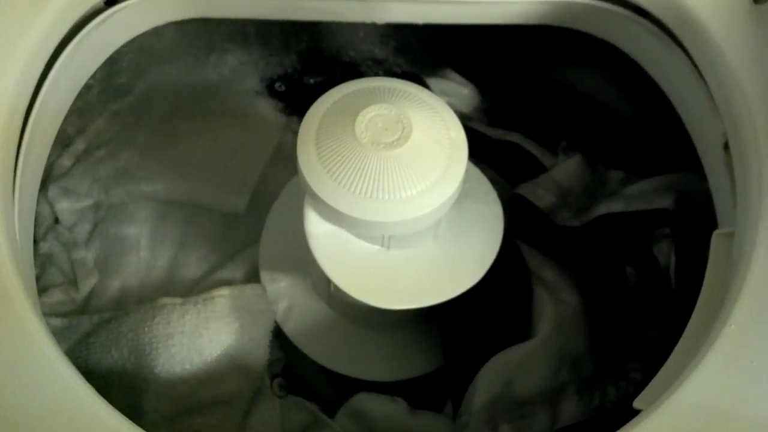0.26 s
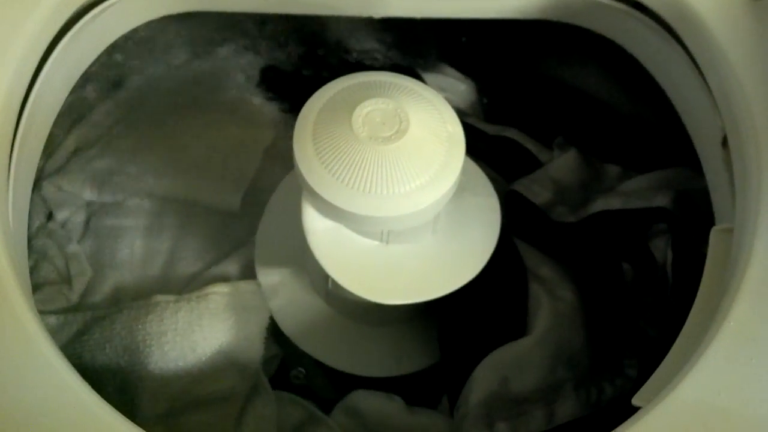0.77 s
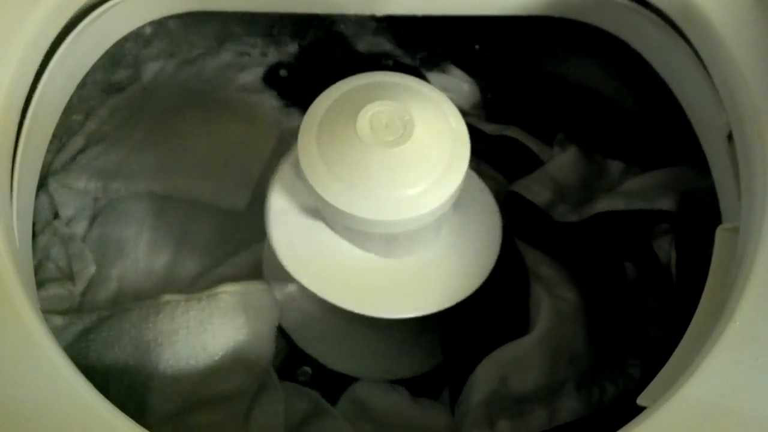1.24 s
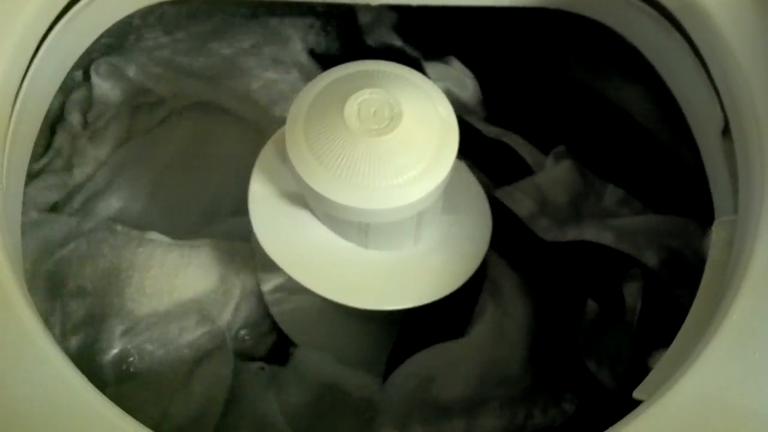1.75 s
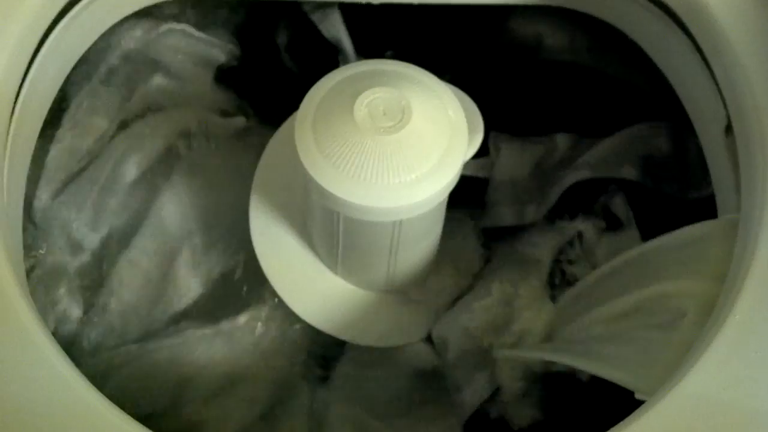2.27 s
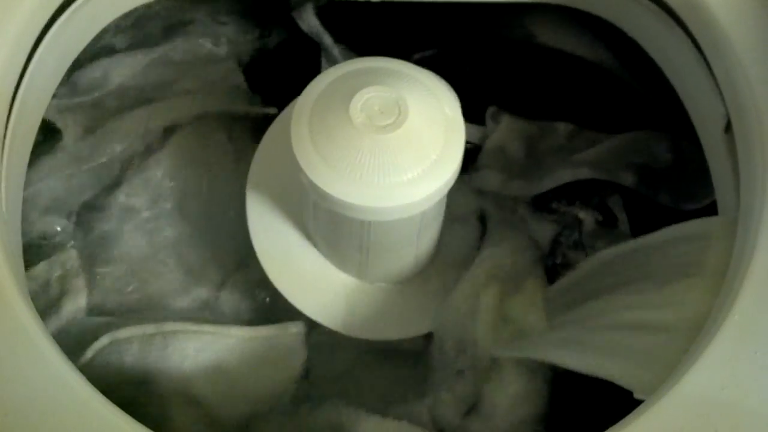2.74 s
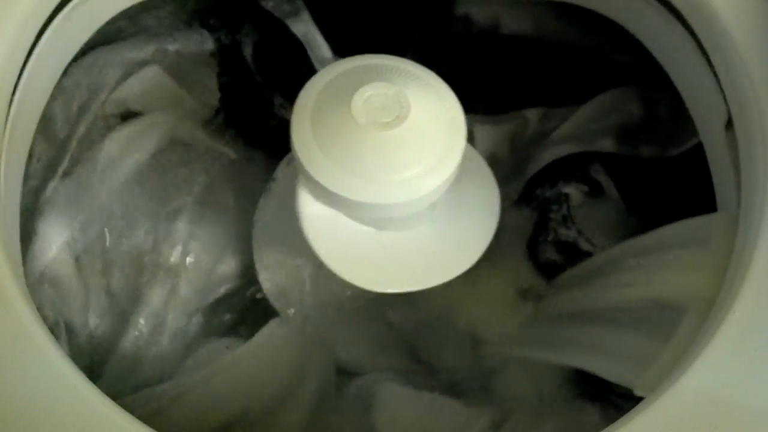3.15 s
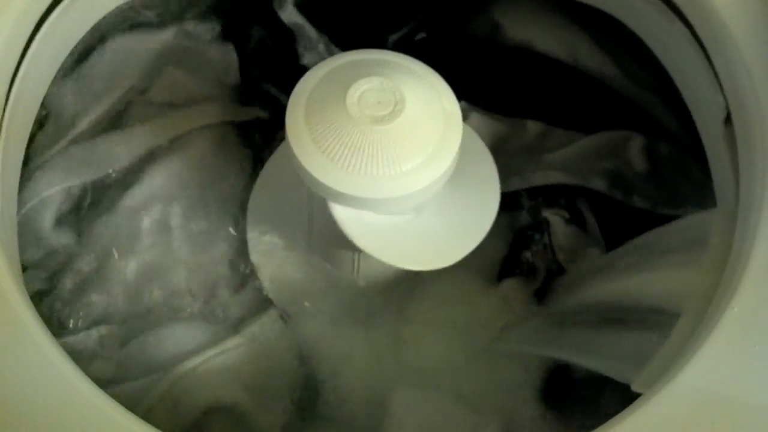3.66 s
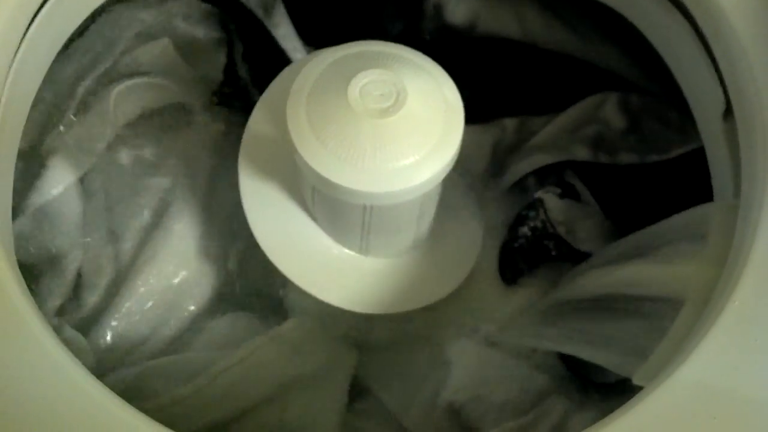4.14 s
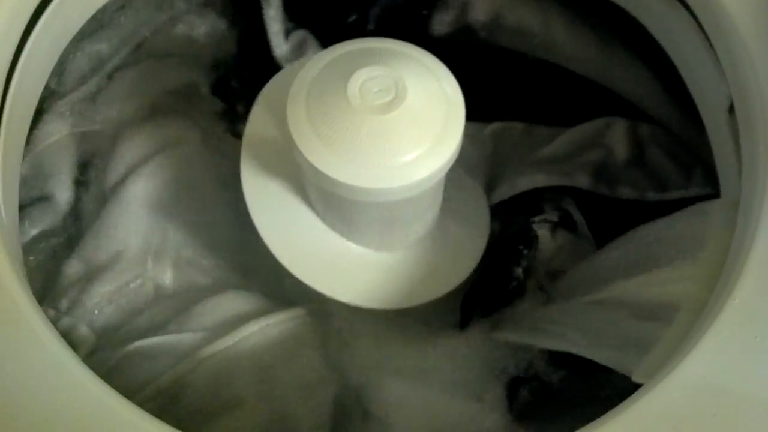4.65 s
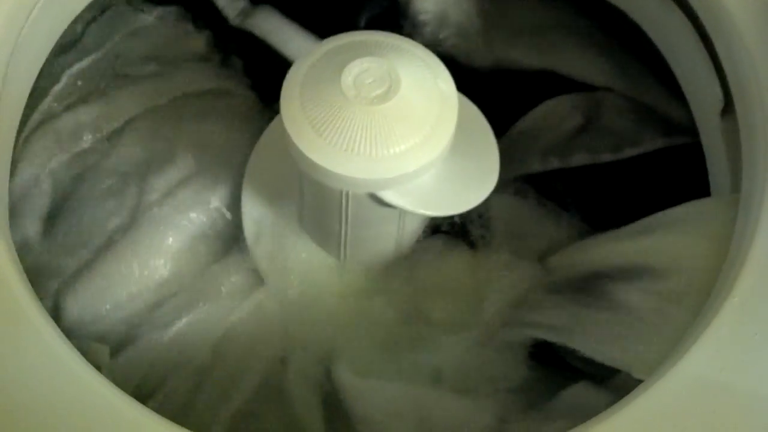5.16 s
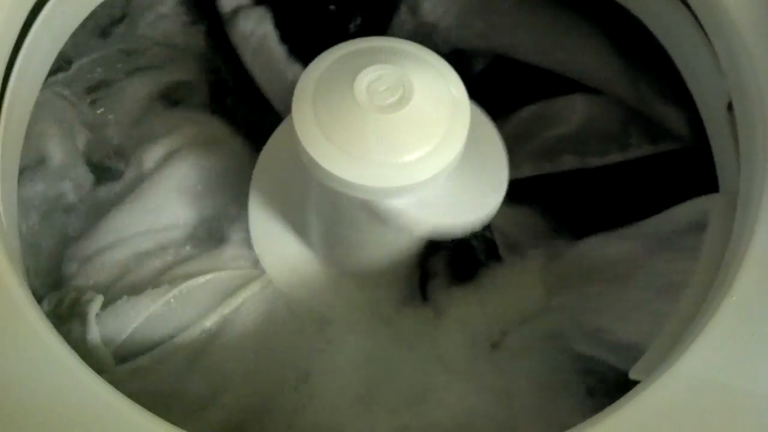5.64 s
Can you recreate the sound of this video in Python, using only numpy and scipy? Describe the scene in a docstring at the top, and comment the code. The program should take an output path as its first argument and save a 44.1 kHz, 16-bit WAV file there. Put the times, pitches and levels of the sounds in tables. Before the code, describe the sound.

A washer's filling hiss thins after a sharp clack, a motor hums, knocks engage the drive, and laundry sloshes rhythmically with one tick per stroke.

```python
"""Water hisses into an open top-loading washing machine, over a washing sound and the buzz of the valve coil.
A valve clacks, the jet thins and stops, and the motor idles; then the drive engages with more knocks.
The agitator swings the laundry to and fro: water noise, humming, gurgles, splashes and about one tick a stroke.
Water is shaped noise and short bubbles, the motor is sine waves, and knocks are bursts ringing a steel cabinet.
The recorder widens its stereo by flipping and delaying the right side."""
import sys
import numpy as np
from scipy import signal
from scipy.fft import rfft, irfft
from scipy.io import wavfile
from scipy.ndimage import uniform_filter1d

SR = 44100
rng = np.random.default_rng(int(sys.argv[2]) if len(sys.argv) > 2 else 0)


def dump(signal):
    """Clip the signal to [-1, 1] and save it as 16-bit WAV at the path in sys.argv[1]."""
    limited = np.clip(np.atleast_2d(signal).T, -1, 1)
    pcm = np.round(limited * 32767).astype(np.int16)
    wavfile.write(sys.argv[1], SR, pcm)


N = 260190  # length of the scene in samples
FRAME, HOP = 1024, 256  # short-time spectra of the water noise, in samples

# fill jet, relative colour: (frequency [Hz], level per Hz [dB])
JET_COLOUR = [(150, -36), (300, -7.5), (500, -7.5), (1000, -12.5), (1600, -16), (2600, -17), (4000, -18.5),
              (5000, -14.5), (6500, -12.5), (9000, -16), (12000, -19), (15800, -22)]
# resonances of the inlet pipe: (frequency [Hz], width [Hz], boost [dB])
PIPE_RESONANCES = [(335, 72, 9.5), (740, 36, 16.5), (1090, 78, 9)]
# churning water: (time [s], level [dB], brightness [dB per octave above the pivot])
CHURN = [(0.0, -27.5, -8), (0.08, -36, 1.5), (0.26, -33.5, 1), (0.76, -35, 1.5), (1.46, -30, -1),
         (1.84, -31, -1), (2.07, -30, -0.5), (3.45, -26.5, 0), (3.91, -28.5, 0.5), (4.5, -26, -0.5),
         (5.04, -28, 0.5), (5.39, -25.5, 0), (5.62, -27.5, 0.5), (5.9, -27.5, 1)]
# churning water, relative colour: (frequency [Hz], level per Hz [dB])
CHURN_COLOUR = [(35, -45), (70, -27), (100, 7.5), (150, 1), (280, 3), (450, -6.5), (750, -7), (1200, -10),
                (1700, -14.5), (2800, -12), (4000, -19), (6500, -21), (9000, -26), (15800, -39)]
# resonances of the air in tub and cabinet: (frequency [Hz], width [Hz], boost [dB])
TUB_RESONANCES = [(95, 17, 2), (190, 43, 5), (255, 37, 1.5), (450.2, 43, 14.5)]
# motor buzz tones, as multiples of the lowest: (multiple [1])
BUZZ_MULTIPLES = [1, 2, 3, 5]
# the same tones while idling: (level [dB])
BUZZ_IDLE_DB = [-36.5, -33.5, -52, -53.5]
# the same tones while driving, fading and coming back as the load shifts: (time [s], level [dB])
BUZZ_1 = [(1.2, -37.2), (1.45, -36), (1.65, -30.5), (1.8, -30), (1.97, -37.5), (2.15, -28), (2.3, -25.5),
          (2.45, -31.5), (2.7, -28), (2.85, -32.5), (3.0, -24), (3.15, -25), (3.32, -30.5), (3.5, -23.5),
          (3.7, -26), (3.9, -30.5), (4.05, -22), (4.25, -28.5), (4.35, -24), (4.45, -31), (4.65, -33),
          (4.85, -27), (5.05, -21.5), (5.15, -35), (5.3, -27), (5.48, -37), (5.62, -31.5), (5.88, -23)]
BUZZ_2 = [(1.2, -34.5), (1.5, -42.5), (1.75, -34), (1.95, -30.5), (2.13, -57), (2.4, -41), (2.65, -34),
          (2.85, -31.5), (3.0, -42), (3.15, -97), (3.3, -35), (3.45, -34.5), (3.62, -30.5), (3.85, -33.5),
          (4.0, -38), (4.2, -37), (4.4, -38), (4.55, -24), (4.72, -33.5), (4.95, -52), (5.15, -28),
          (5.35, -34.5), (5.45, -25), (5.6, -33), (5.75, -50), (5.88, -40)]
BUZZ_3 = [(1.2, -55), (1.75, -43.5), (1.9, -46), (2.15, -46), (2.5, -87), (2.75, -35.5), (3.05, -34),
          (3.6, -40), (3.95, -35), (4.55, -42.5), (4.7, -34.5), (5.05, -36.5), (5.15, -56), (5.35, -28),
          (5.45, -40), (5.88, -28.5)]
BUZZ_5 = [(1.2, -61), (2.0, -55), (2.501, -49), (2.7, -47), (2.82, -46), (3.0, -43), (3.5, -41.5),
          (3.75, -42), (4.1, -41), (4.35, -43), (4.6, -41.5), (5.0, -43.5), (5.4, -43), (5.6, -40),
          (5.9, -53)]
# load on the drive as the laundry gets moving; the whine follows a share of it: (time [s], load [dB])
LOAD = [(1.2, -25), (1.55, -11), (1.85, -9.5), (2.2, -10.5), (3.0, -1), (3.6, -9), (4.2, 11), (4.6, -3),
        (5.0, 4), (5.3, 2), (5.55, -9), (5.9, 14)]
# gear whine, swelling once and twice per stroke: (idling [dB], driving [dB], share of the load it follows [1],
# swell [dB], its crest [share of stroke], double swell [dB], its crest [share of stroke])
WHINE = (-47, -40, 0.42, 1.5, 0.9, 2.5, 0.19)
# steel cabinet modes: (frequency [Hz], relative level [dB], undamped time to fall 60 dB [s])
CABINET = [(298, -5, 0.11), (660, -16, 0.063), (897, -6, 0.2), (1180, -7, 0.16), (1480, -2.5, 0.21),
           (1630, -0.5, 0.09), (1850, -1, 0.12), (2065, 2, 0.2), (2370, 0.5, 0.1), (3170, -5, 0.24),
           (3920, -7.5, 0.11), (4630, -4.5, 0.017), (6570, -7.5, 0.13), (9500, -15, .04)]
# valve and clutch knocks: (time [s], level [dB], rattle length [s], brightness [dB per octave],
# damping [0-1], contact time [ms])
KNOCKS = [(0.190, -19, 0.02, -0.5, 0.27, 0.056), (0.21, -23.5, 0.013, -2.5, 0.44, 0.049),
          (0.217, -32, 0.13, -5.5, 0.5, 0.078), (1.120, -31, 0.03, -1, 0.75, 0.1),
          (1.125, -29.5, 0.012, -7, 0.75, 0.3), (1.131, -29, 0.01, -7, 0.75, 0.35),
          (1.137, -27.5, 0.01, -6, .75, 0.35), (1.146, -29, 0.02, -7, 0.7, 0.4),
          (1.156, -31, 0.04, -6, 0.7, 0.35), (1.180, -32, 0.02, -10, 0.6, 0.5),
          (1.185, -34, 0.004, -1, 0.7, 0.12)]
# splashes, single drops, low slops and the loudest gurgles:
# (time [s], level [dB], centre [Hz], width [share of centre], length [ms])
SPLASHES = [(0.767, -35.5, 6300, 1.1, 26), (1.191, -34, 4950, 1.55, 36), (1.931, -50, 12500, .5, 5),
            (2.104, -41, 4500, 1.2, 14), (2.238, -42, 6000, 0.87, 5), (2.294, -42, 6500, .8, 8.7),
            (2.335, -39, 3680, 1.4, 31), (2.346, -31.5, 3400, 0.34, 8), (2.382, -67, 6500, 0.85, 6.5),
            (2.508, -36, 1540, 0.34, 12), (2.548, -34, 4300, 1.1, 6.4), (2.562, -45, 8850, 1.2, 50),
            (2.649, -37.5, 5470, 1.14, 30), (2.655, -29, 4940, 0.45, 4.6), (2.727, -35, 4240, 0.41, 3.8),
            (3.006, -35, 3720, 0.44, 6.8), (3.025, -35, 7040, 0.39, 8.2), (3.099, -42, 6000, 1.1, 49),
            (3.183, -36.5, 4740, .7, 19), (3.239, -33.5, 3800, 1.3, 27), (3.254, -33, 3300, 0.3, 28),
            (3.259, -28, 3540, .3, 5.9), (3.299, -51, 6200, 0.44, 5), (3.3, -32, 190, 0.46, 47),
            (3.391, -35, 240, 0.79, 55), (3.47, -36, 175, .4, 140), (3.601, -30, 205, 0.37, 70),
            (3.2, -37, 800, 1, 90), (2.25, -38, 185, .4, 82), (4.3, -32, 190, 0.45, 70),
            (5.42, -36, 260, 0.7, 50), (3.377, -37, 5950, 0.44, 6), (3.397, -27.5, 4300, 0.37, 2.9),
            (3.4, -37.5, 4100, 0.22, 15), (3.771, -29, 2530, 0.18, 13), (3.818, -40.5, 6500, 1.3, 7.8),
            (3.92, -35.5, 6500, 0.79, 6), (3.942, -35, 1200, 0.17, 14), (4.01, -39, 1180, 0.12, 45),
            (4.086, -36, 1310, 0.63, 9.8), (4.17, -36.5, 1240, 0.46, 16), (4.247, -31.5, 1200, .3, 13),
            (4.365, -36, 1100, 0.16, 17), (3.995, -29, 7500, 1.2, 2.1), (3.995, -31, 3200, 1, 5.3),
            (4.0, -31, 3700, 0.99, 10), (4.05, -35, 5770, 0.74, 7.1), (4.165, -37, 3440, 1.4, 26),
            (4.542, -40.5, 4060, .6, 5.2), (4.813, -41, 3600, 0.7, 6), (5.023, -36, 2700, .4, 6.9),
            (5.084, -38, 5330, 0.84, 26), (5.261, -40, 7550, 0.4, 24), (5.654, -31, 2400, 0.91, 7.4),
            (5.69, -36, 2250, 0.27, 12), (5.17, -39, 2050, .25, 12), (4.72, -37, 1290, 0.34, 18),
            (4.521, -38, 1160, .25, 17), (4.975, -33.5, 844, 0.49, 34), (5.875, -40, 5500, 1.1, 10)]
# gear ticks, about once a stroke: (time [s], relative level [dB], starting pitch of the main ring [Hz])
TICKS = [(1.8860, -23.5, 2000), (2.803, -32, 2200), (3.718, -29, 2300), (4.632, -27, 2350),
         (5.555, -28, 2300), (5.563, -25, 2250)]
# faint knock in each tick: (rattle length [s], brightness [dB per octave], damping [0-1], contact time [ms])
TICK_KNOCK = (0.0024, .4, 0.27, 0.19)
# right side against the left, away from multiples of the widening delay's frequency:
# (frequency [Hz], likeness [0-1], level [dB], phase lead [radians])
SIDES = [(60.3, 0.96, -3, -0.41), (126, 0.93, -3, -0.12), (278, 1, -3, -0.86), (314, 0.88, -5, -0.27),
         (486, 0.99, -2, -0.41), (680, 0.86, -1, -0.62), (1320, 0.98, 0, 0.17), (2020, 0.91, 2, -0.073),
         (3600, 0.98, 2.5, 0.037), (4900, 0.94, 3, -0.0048), (6500, 0.83, 1.5, -0.077), (9400, 1, 2, 0.013),
         (16000, 1, -1, 0.29)]

# fill jet: full flow, throttled after the clack, a slow sag, then shut off
JET_FULL_DB, JET_THROTTLED_DB, JET_SAG_DB_PER_S, JET_FADE_DB_PER_S = -26.5, -33, 3, 76
CLACK_S, THROTTLE_S, SHUT_S = 0.18, 0.059, 0.97
# the thinning jet loses its top first, per octave above this pitch
JET_DULLS_S, JET_DULL_HZ, JET_DULL_DB_PER_S = 0.65, 6000, 12
PIVOT_HZ = 1200  # brightness of churn and bubbles tilts about this pitch
# small bubbles relative to the wash; the drops also follow its brightness
DROPS_DB, DROPS_PER_S = -21.5, 690
SPATTER_DB, SPATTERS_PER_S = -25, 54  # drops that slap the tub wall
GLUGS_DB, GLUGS_PER_S = -13.5, 55  # air pockets squeezed from the cloth
COIL_DB = -32
MOTOR_ON_S, MOTOR_RISE_S, ENGAGE_S, ENGAGE_RISE_S = 0.23, 0.13, 1.07, 0.24
STROKE_S, STROKE_START_S = 0.9175, 1.886  # length of a stroke, and the time its cycle is counted from
BUZZ_HZ, WHINE_HZ = 120.03, 502
BUZZ_WAVER_DB, WHINE_WAVER_DB = 1.6, 3  # quick unsteadiness while driving
WHINE_SWAY_HZ, WHINE_CREST = 5.25, 0.12  # pitch sway twice a stroke; its crest as a share of the stroke
MODE_SPREAD = 0.05  # spread of each cabinet mode, as a share of its pitch
CRACK_DB = 6  # broad crack of each blow against its ring
SPLASH_LUMPS_DB = 4
SPLASH_RISE, SPLASH_FALL_DB = 0.12, 10  # rise as a share of the length; fall over one length
TICK_MS, TICK_GLIDE, TICK_KNOCK_DB = 0.9, -0.04, -6  # time to the snap's peak; pitch drift; knock offset
GURGLE_LOW_HZ, GURGLE_HIGH_HZ, GURGLES_PER_S = 981, 1377, 120
# air pockets gurgle under the cloth: a quick rise, a hold, a small drop and a slow fade
GURGLE_S, GURGLE_RISE_S, GURGLE_HOLD_S = 3.92, 0.015, 0.3
GURGLE_DB, GURGLE_DROP_DB, GURGLE_FADE_DB_PER_S = -38, 2.5, 8
LOW_CUT_HZ, EDGE_HZ = 89, 15740  # microphone bass roll-off and upper band limit
WIDEN_SAMPLES = 16  # delay of the right side


def gain_of(db):
    """Turns decibels into a multiplier for the wave."""
    return 10 ** (np.asarray(db) / 20)


def to_unit_rms(x):
    """Scales a signal to an average strength (rms) of 1."""
    return x / np.sqrt(np.mean(x ** 2) + 1e-20)


def read(points, hz):
    """Reads a frequency table between its points; pitch is spaced by ratio, as in hearing."""
    f, value = np.transpose(points)
    return np.interp(np.log(hz + 1), np.log(f + 1), value)


def ramp(t, start, length):
    """Goes in a straight line from 0 to 1."""
    return np.clip((t - start) / length, 0, 1)


def add(mix, s, sound):
    """Mixes a sound in at time s."""
    part = mix[round(s * SR):][:len(sound)]
    part += sound[:len(part)]


def resonance_boost(table, hz):
    """Adds up the peaks, in dB, where a resonance strengthens certain pitches."""
    return sum(db / (1 + (2 * (hz - f) / width) ** 2) for f, width, db in table)


def smooth_noise(shape, first_size, first_axis, second_size, second_axis):
    """Slowly varying random values, averaged over neighbours twice."""
    noise = rng.standard_normal(shape)
    noise = uniform_filter1d(noise, size=first_size, axis=first_axis)
    return to_unit_rms(uniform_filter1d(noise, size=second_size, axis=second_axis))


def rush(colour_db, patchy_db, flicker_db):
    """Rushing water as noise with drifting patches and a flicker shared by wide bands."""
    shape = (FRAME // 2 + 1, colour_db.shape[1])  # frequencies by moments
    noise = rng.standard_normal(shape) + 1j * rng.standard_normal(shape)
    patches = smooth_noise(shape, 10, 0, 12, 1)
    flicker = smooth_noise(shape, 200, 0, 3, 1)
    spectra = noise * gain_of(colour_db + patchy_db * patches + flicker_db * flicker)
    return signal.istft(spectra, nperseg=FRAME, noverlap=FRAME - HOP)[1][:N]


def jet():
    """Water forced through the valve hisses and rings the inlet pipe."""
    hz, t = np.fft.rfftfreq(FRAME, 1 / SR), np.arange(N) / SR
    frame_s = np.arange(N // HOP + 5) * HOP / SR
    octaves = np.log2(np.maximum(hz / JET_DULL_HZ, 1))[:, None]
    dull_db = JET_DULL_DB_PER_S * octaves * np.maximum(frame_s - JET_DULLS_S, 0)
    steady_db = read(JET_COLOUR, hz) + resonance_boost(PIPE_RESONANCES, hz)
    hiss = to_unit_rms(rush(steady_db[:, None] - dull_db, patchy_db=0.1, flicker_db=0.5))
    level_db = JET_FULL_DB + (JET_THROTTLED_DB - JET_FULL_DB) * ramp(t, CLACK_S, THROTTLE_S)
    level_db -= JET_SAG_DB_PER_S * np.maximum(t - CLACK_S, 0)
    level_db -= JET_FADE_DB_PER_S * np.maximum(t - SHUT_S, 0)
    return hiss * gain_of(level_db)


def bubbles(pitches, per_s, spread_db, cycles, tilt_db, glide):
    """Short ringing bubbles that rise in pitch, each pitch with its own random train; a few are loud."""
    out, t = np.zeros(N), np.arange(1500) / SR
    loudness_db = spread_db * np.minimum(rng.exponential(1, N), 4)
    starts = gain_of(loudness_db) * (rng.random(N) < per_s / SR)
    kind = rng.integers(0, len(pitches), N)
    for k, hz in enumerate(pitches):
        turns = hz * t
        ring = np.sin(2 * np.pi * turns * (1 + glide * turns / cycles))
        bubble = ring * turns * np.exp(-turns / cycles)
        bubble = bubble * gain_of(tilt_db * np.log2(hz / PIVOT_HZ))
        out += signal.oaconvolve(starts * (kind == k), bubble)[:N]
    return to_unit_rms(out)


def drops():
    """Fine spray as a dense rain of bubbles of many pitches."""
    pitches = np.geomspace(700, 7000, num=24)
    return bubbles(pitches, DROPS_PER_S, spread_db=3.5, cycles=3.5, tilt_db=-3.5, glide=0.029)


def spatter():
    """Sparse, bright slaps of single drops, each ringing very briefly."""
    pitches = np.geomspace(1800, 9000, num=16)
    return bubbles(pitches, SPATTERS_PER_S, spread_db=3, cycles=2.2, tilt_db=0, glide=0.03)


def glugs():
    """Sparse, low bubbles of many pitches, ringing a little longer."""
    pitches = np.geomspace(400, 2200, num=20)
    return bubbles(pitches, GLUGS_PER_S, spread_db=2.5, cycles=6, tilt_db=-3, glide=0.04)


def churn():
    """Water and wet cloth wash round the tub; a brighter wash carries more drop sound."""
    hz, t = np.fft.rfftfreq(FRAME, 1 / SR), np.arange(N) / SR
    frame_s = np.arange(N // HOP + 5) * HOP / SR
    s, level_db, bright = np.transpose(CHURN)
    octaves = np.log2(np.maximum(hz / PIVOT_HZ, 1))[:, None]
    steady_db = read(CHURN_COLOUR, hz) + resonance_boost(TUB_RESONANCES, hz)
    colour_db = steady_db[:, None] + octaves * np.interp(frame_s, s, bright)
    wash = to_unit_rms(rush(colour_db, patchy_db=1.28, flicker_db=0.3))
    spray = gain_of(DROPS_DB + 9.7 * np.interp(t, s, bright)) * drops()
    stirred = gain_of(SPATTER_DB) * spatter() + gain_of(GLUGS_DB) * glugs()
    spray += ramp(t, ENGAGE_S, STROKE_S) * stirred  # these grow in over one stroke
    return gain_of(np.interp(t, s, level_db)) * (wash + spray)


def coil(t):
    """The valve coil buzzes on the lowest motor tone and dies away at the clack."""
    return gain_of(COIL_DB) * (1 - ramp(t, CLACK_S, THROTTLE_S)) * np.sin(2 * np.pi * BUZZ_HZ * t)


def motor_buzz(t, engaged, phase_drift, level_drift):
    """The motor sounds a stack of tones with slightly drifting phase, whose levels waver once it is driving."""
    out = np.zeros(N)
    for k, level in enumerate([BUZZ_1, BUZZ_2, BUZZ_3, BUZZ_5]):
        drive_db = np.interp(t, *np.transpose(level)) + BUZZ_WAVER_DB * level_drift[k]
        db = BUZZ_IDLE_DB[k] + engaged * (drive_db - BUZZ_IDLE_DB[k])
        phase = 2 * np.pi * BUZZ_MULTIPLES[k] * BUZZ_HZ * t + 0.15 * phase_drift[k] + k
        out += gain_of(db) * np.sin(phase)
    return out


def gear_whine(t, engaged, phase_drift, level_drift):
    """The gear whines on one tone, swaying in pitch; while driving it swells with stroke and load."""
    turn = 2 * np.pi * (t - STROKE_START_S) / STROKE_S
    load_db = np.interp(t, *np.transpose(LOAD))
    idle_db, drive_db, share, once_db, crest, twice_db, crest_twice = WHINE
    swell_db = once_db * np.cos(turn - 2 * np.pi * crest)
    swell_db += twice_db * np.cos(2 * (turn - 2 * np.pi * crest_twice))
    change_db = drive_db - idle_db + share * load_db + swell_db + WHINE_WAVER_DB * level_drift
    # a phase swing that moves the pitch up and down by WHINE_SWAY_HZ
    sway = WHINE_SWAY_HZ * STROKE_S / 2 * np.sin(2 * (turn - 2 * np.pi * WHINE_CREST))
    tone = np.sin(2 * np.pi * WHINE_HZ * t + sway + 0.5 * phase_drift)
    return gain_of(idle_db + engaged * change_db) * tone


def hum():
    """The coil buzzes first; then the motor and gear start, idle and take up the drive."""
    t = np.arange(N) / SR
    on, engaged = ramp(t, MOTOR_ON_S, MOTOR_RISE_S), ramp(t, ENGAGE_S, ENGAGE_RISE_S)
    phase_drift, level_drift = smooth_noise((2, 5, N), 3000, 2, 1500, 2)
    buzz = motor_buzz(t, engaged, phase_drift[:4], level_drift[:4])
    whine = gear_whine(t, engaged, phase_drift[4], level_drift[4])
    return np.sqrt(2) * (coil(t) + on * (buzz + whine))  # root 2 makes the tone levels rms


def cabinet_ring(t, bright, lively):
    """Each cabinet mode rings as four close neighbours that beat together."""
    ring = np.zeros(len(t))
    for hz, mode_db, t60 in CABINET:
        near = 1 + MODE_SPREAD * rng.uniform(-0.85, 1, (4, 1))
        db = mode_db + bright * np.log2(hz / 1900) - 60 * t / (t60 * lively)
        ring += gain_of(db) * np.sin(2 * np.pi * hz * near * t).sum(axis=0)
    return ring


def cabinet_crack(t, bright, lively):
    """Fading noise stands for the many cabinet modes in between."""
    f = np.fft.rfftfreq(len(t), 1 / SR)
    colour_db = read([mode[:2] for mode in CABINET], f) + bright * np.log2((f + 200) / 1900)
    colour = gain_of(colour_db) * f ** 2 / (f ** 2 + 250 ** 2)
    noise = irfft(rfft(rng.standard_normal(len(t))) * colour, len(t))
    return to_unit_rms(noise) * gain_of(-60 * t / (0.13 * lively))


def knock(db, rattle, bright, damping, contact_ms):
    """A run of small bounces cracks and rings the cabinet; a blunt blow favours its low modes."""
    t = np.arange(SR // 4) / SR
    bounces = rng.standard_normal(len(t)) * (rng.random(len(t)) < 0.15) * np.exp(-2 * t / rattle)
    bounces[0] = 2  # a firm first blow
    lively = 1 - np.clip(damping, 0, 0.95)
    ring, crack = cabinet_ring(t, bright, lively), cabinet_crack(t, bright, lively)
    body = ring / np.linalg.norm(ring) + gain_of(CRACK_DB) * crack / np.linalg.norm(crack)
    push_s = t[:200]
    push = push_s * np.exp(-push_s / (max(contact_ms, 0.02) / 4000))  # a longer contact dulls the treble
    sound = signal.fftconvolve(np.convolve(bounces, push), body)[:len(t)]
    # the panel is too small to radiate deep bass
    sound = signal.lfilter(*signal.butter(2, 170, "high", fs=SR), sound)
    opening = sound[:round((rattle + 0.005) * SR)]
    return gain_of(db) * sound / np.sqrt(np.mean(opening ** 2))


def splash(db, hz, share, ms):
    """A burst of water sound: grainy noise in one band, quick rise, lumpy fall."""
    t = np.arange(SR // 5) / SR
    f = np.fft.rfftfreq(len(t), 1 / SR)
    band = 1 / (1 + (2 * np.log((f + 1) / hz) / share) ** 4)
    burst = irfft(rfft(rng.standard_normal(len(t))) * band, len(t))
    lumps = to_unit_rms(uniform_filter1d(rng.standard_normal(len(t)), size=70))
    u = 1000 * t / ms  # time in splash lengths
    burst *= gain_of(SPLASH_LUMPS_DB * lumps - SPLASH_FALL_DB * u ** 2)
    burst *= 1 - np.exp(-u / SPLASH_RISE)
    return gain_of(db) * burst / np.sqrt(np.sum(burst ** 2) / (ms * SR / 1000))


def tick(db, hz):
    """A few cycles of a hard plastic snap, with a faint knock on the cabinet."""
    t = np.arange(SR // 4) / SR
    u = 1000 * t / TICK_MS
    turn = 2 * np.pi * hz * t * (1 + TICK_GLIDE * np.minimum(u, 4))
    tones = np.sin(turn) + 0.45 * np.sin(1.6 * turn) + 0.25 * np.sin(2.3 * turn)  # two higher modes
    snap = u * np.exp(1 - u) * tones
    return 2 * gain_of(db) * snap + knock(db + TICK_KNOCK_DB, *TICK_KNOCK)


def gurgle():
    """Air pockets under the cloth gurgle as larger bubbles of like size."""
    t = np.arange(N) / SR
    pitches = np.geomspace(GURGLE_LOW_HZ, GURGLE_HIGH_HZ, num=8)
    sound = bubbles(pitches, GURGLES_PER_S, spread_db=2.5, cycles=5, tilt_db=0, glide=0.006)
    hold_end = GURGLE_S + GURGLE_RISE_S + GURGLE_HOLD_S
    db = GURGLE_DB - GURGLE_DROP_DB * ramp(t, hold_end, GURGLE_RISE_S)
    db -= GURGLE_FADE_DB_PER_S * np.maximum(t - hold_end, 0)
    return sound * gain_of(db) * ramp(t, GURGLE_S, GURGLE_RISE_S)


def random_phase(x):
    """The same sound with its phase redrawn at random in each short frame and band."""
    z = signal.stft(x, SR, nperseg=192, noverlap=144)[2]
    z = 2 * z * np.exp(2j * np.pi * rng.random(z.shape))  # unrelated frames add in power, hence the 2
    return signal.istft(z, SR, nperseg=192, noverlap=144)[1][:N]


def two_sides(tub, near):
    """The second side shares the near sounds and part of the tub's; a random-phase copy fills the rest."""
    hz = np.fft.rfftfreq(N, 1 / SR)
    f, *columns = np.transpose(SIDES)
    alike, db, lead = (read(np.transpose([f, column]), hz) for column in columns)
    # from the first comb tooth up, both sides agree fully at each multiple of the widening delay's frequency
    teeth = hz * WIDEN_SAMPLES / SR
    apart = np.where(teeth < 0.75, 1, np.minimum(11.4 * np.sin(np.pi * teeth) ** 2, 1))
    alike = 1 - apart * (1 - np.clip(alike, 0, 1))
    shared = (alike * rfft(tub) + rfft(near)) * np.exp(1j * lead * apart)
    unlike = np.sqrt(1 - alike ** 2) * rfft(random_phase(tub))
    other = (shared + unlike) * gain_of(db * apart)
    return np.array([tub + near, irfft(other, N)])


def scene():
    """Water and knocks make the tub sound; hum, ticks and splashes are the near sounds both sides share."""
    tub = jet() + churn() + gurgle()
    near = hum()
    for s, *row in KNOCKS:
        add(tub, s, knock(*row))
    for s, *row in SPLASHES:
        add(near, s, splash(*row))
    for s, *row in TICKS:
        add(near, s, tick(*row))
    return two_sides(tub, near)


def record(dry):
    """Bass roll-off, stereo widening (right side flipped and late, so the sum is combed), then band limit."""
    bass_cut = signal.butter(2, LOW_CUT_HZ, "high", fs=SR, output="sos")
    dry = signal.sosfilt(bass_cut, dry)
    late = np.pad(dry[1], (WIDEN_SAMPLES, 0), "reflect")[:N]
    wide = np.array([dry[0], -late])
    band_limit = signal.firwin(511, EDGE_HZ, window=("kaiser", 9), fs=SR)
    return signal.oaconvolve(wide, band_limit[None], "same")


dry = scene()
out = record(dry)
dump(out)
```